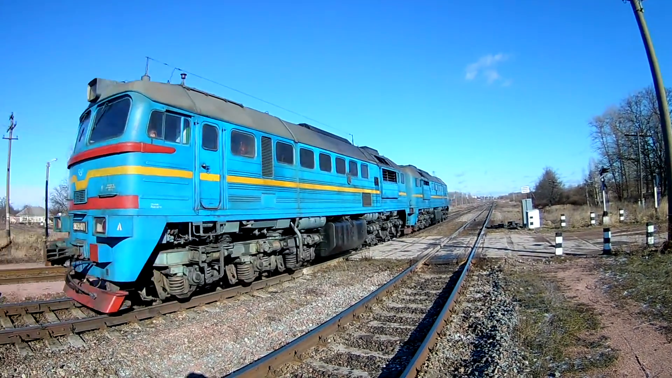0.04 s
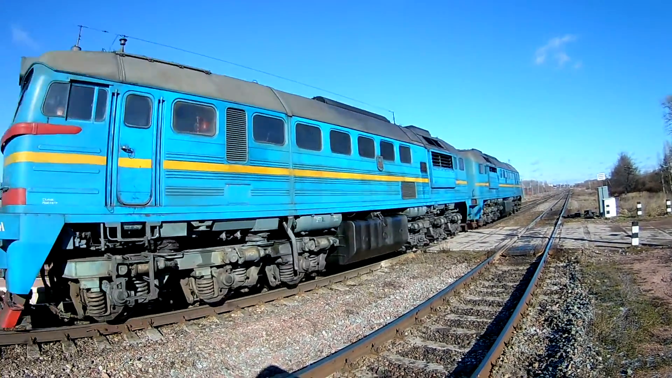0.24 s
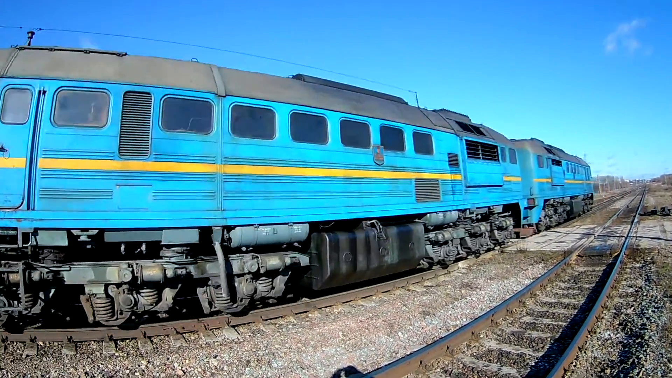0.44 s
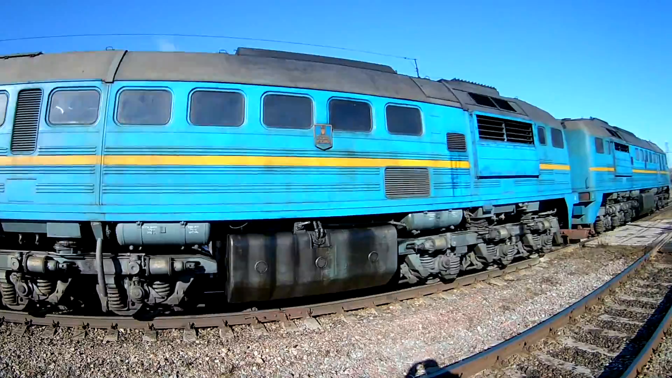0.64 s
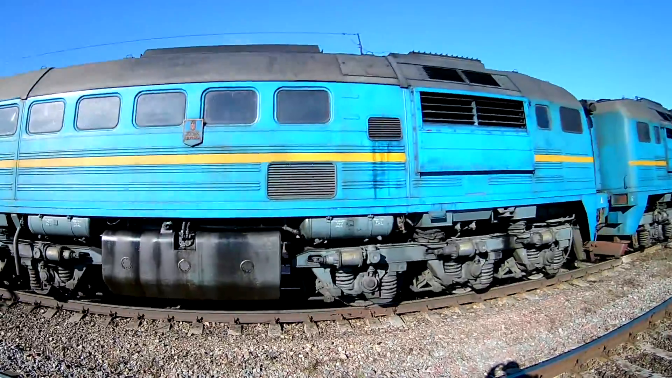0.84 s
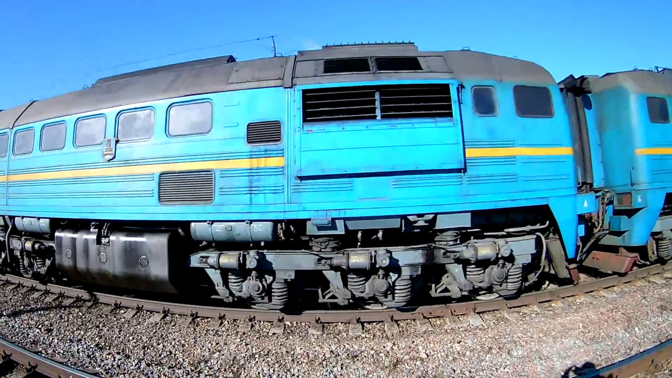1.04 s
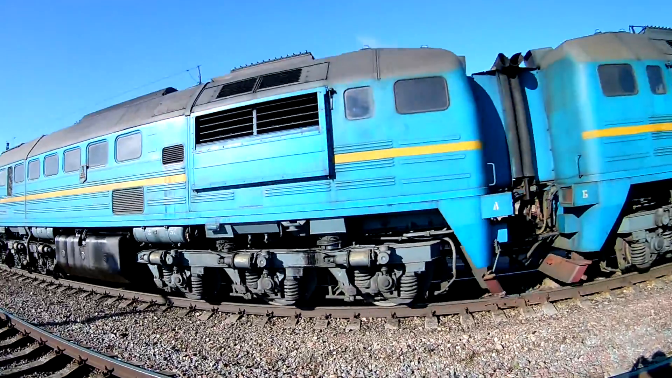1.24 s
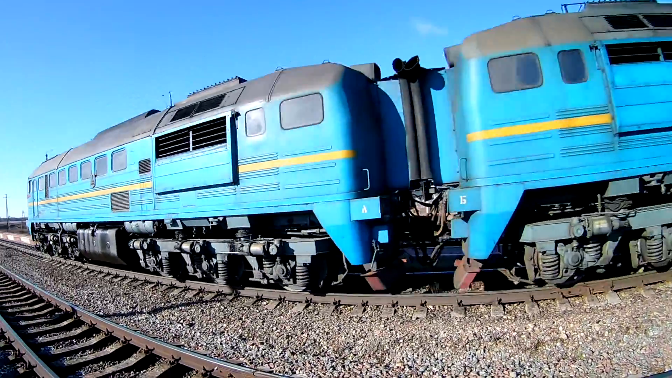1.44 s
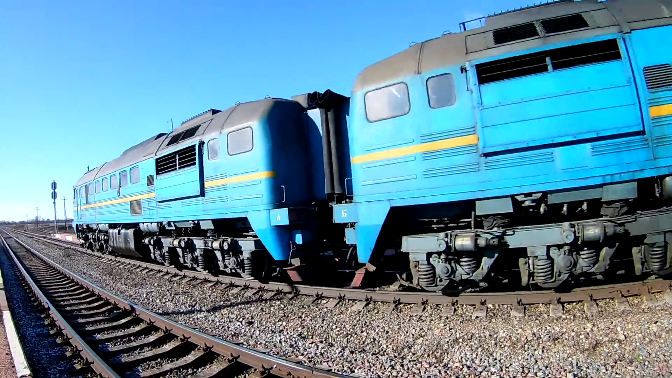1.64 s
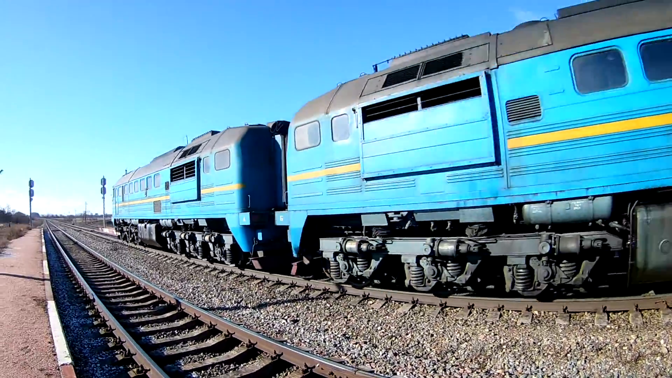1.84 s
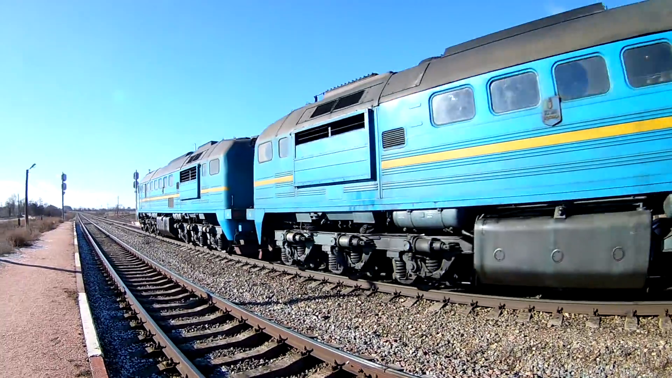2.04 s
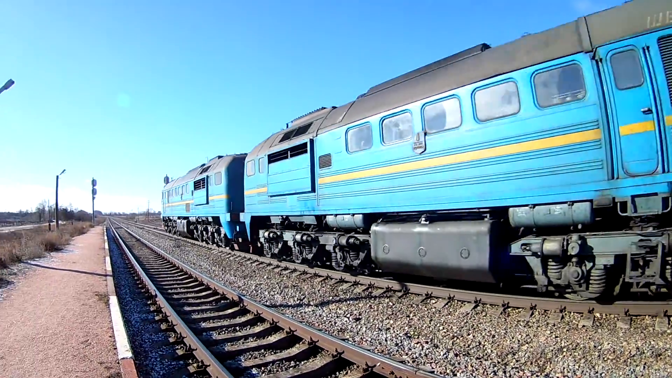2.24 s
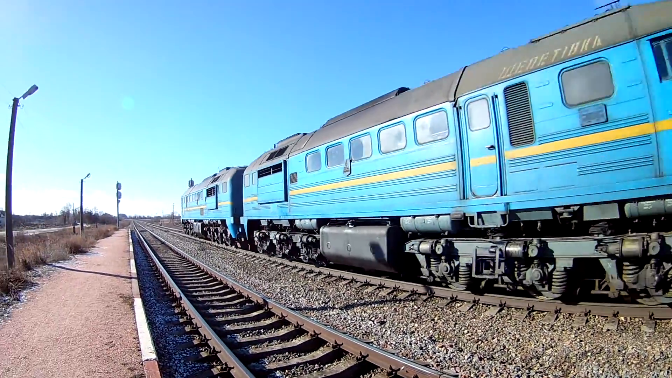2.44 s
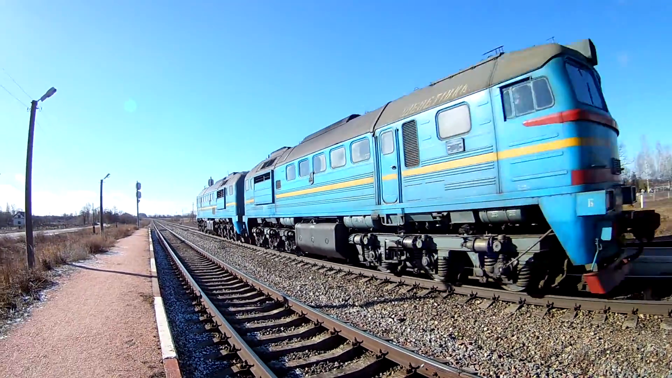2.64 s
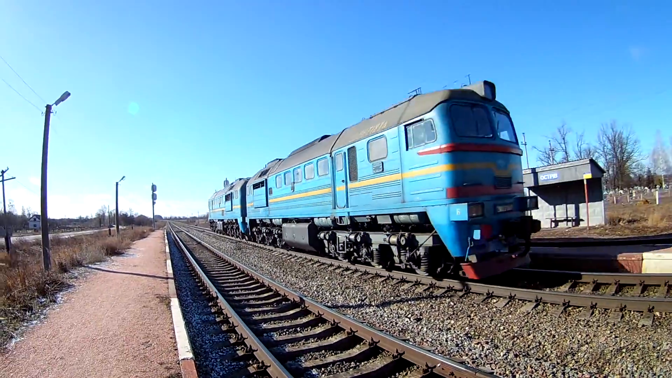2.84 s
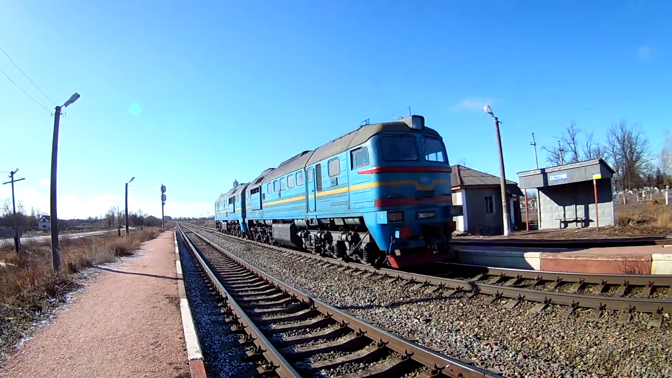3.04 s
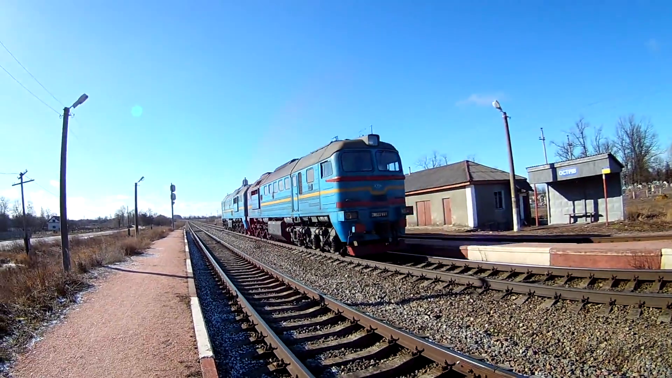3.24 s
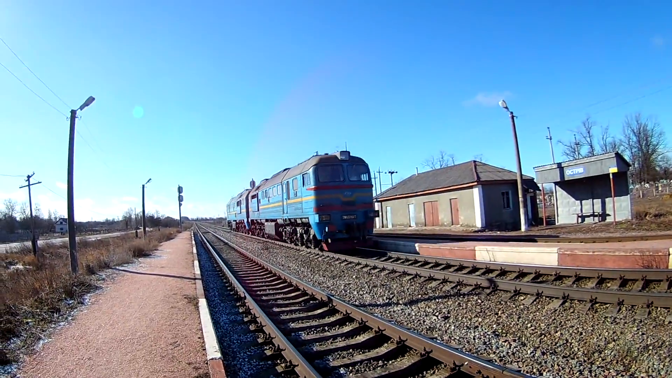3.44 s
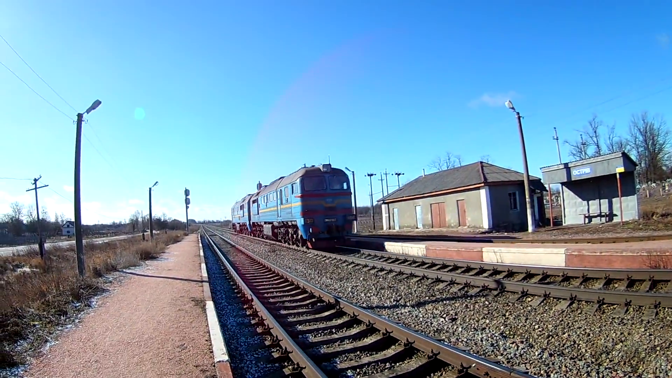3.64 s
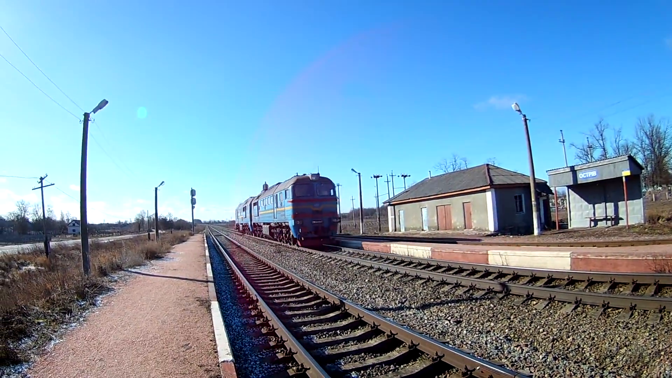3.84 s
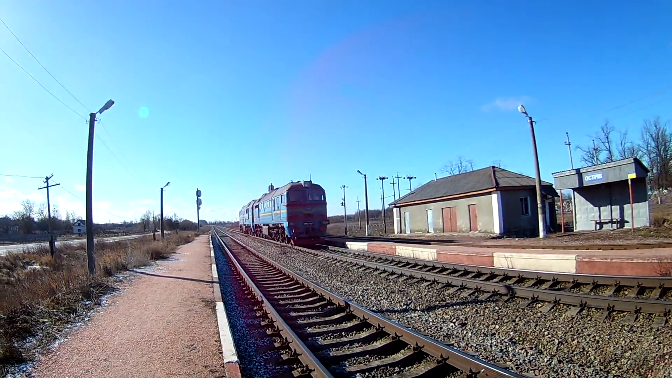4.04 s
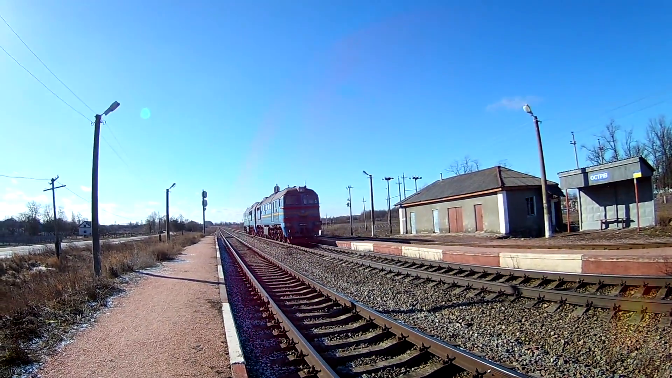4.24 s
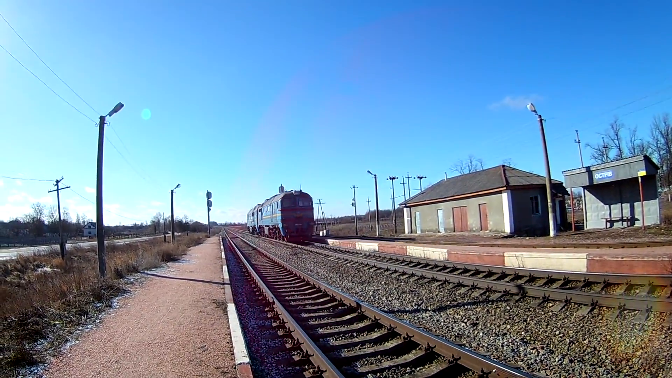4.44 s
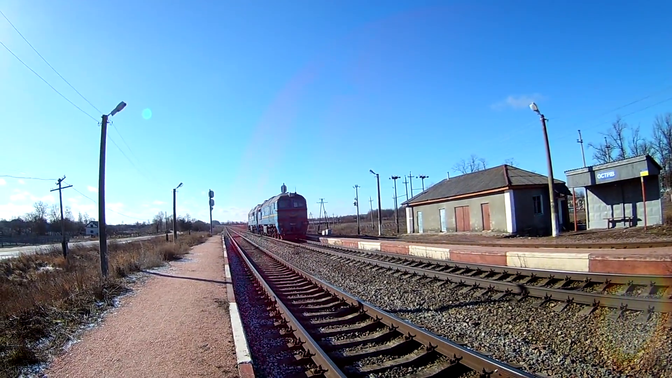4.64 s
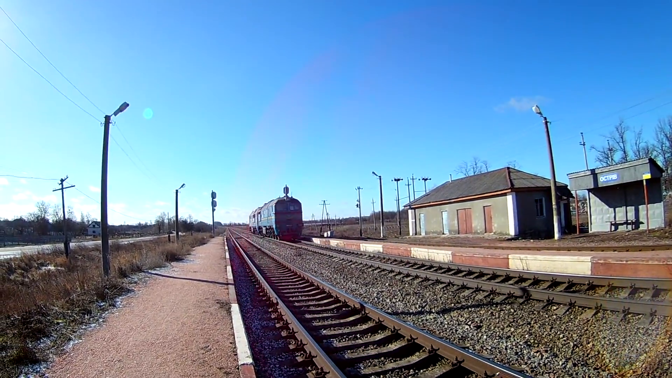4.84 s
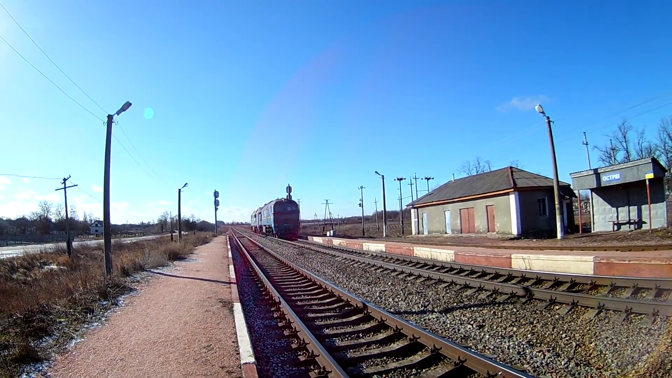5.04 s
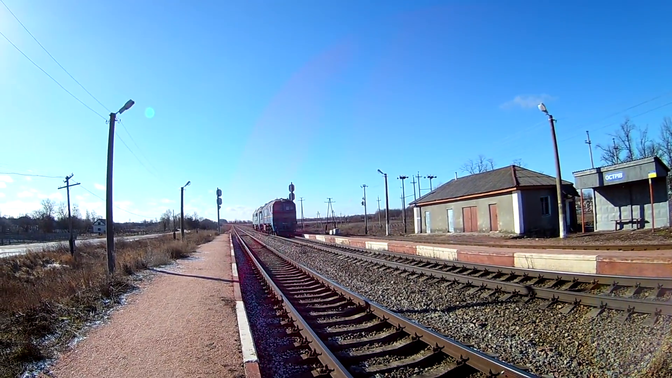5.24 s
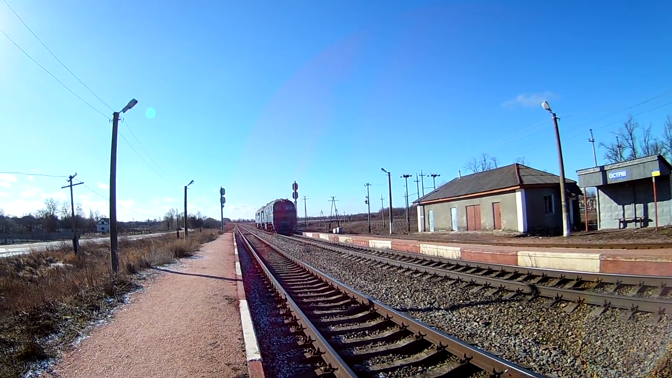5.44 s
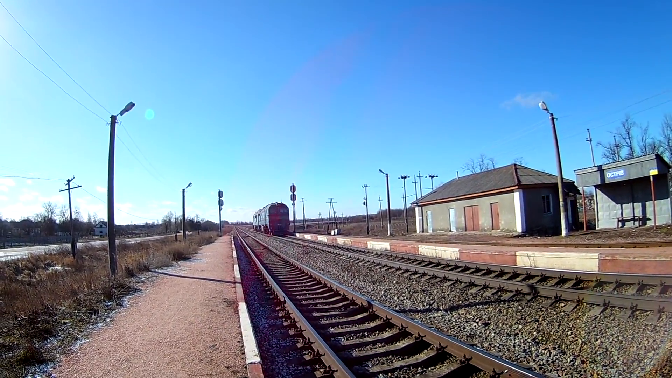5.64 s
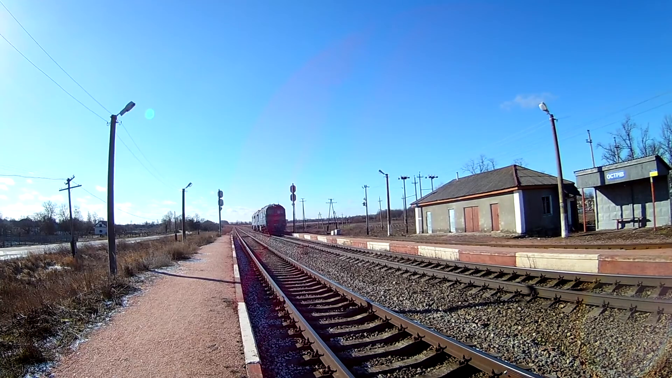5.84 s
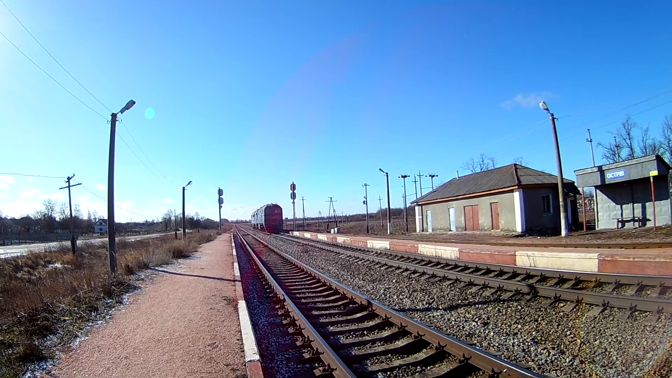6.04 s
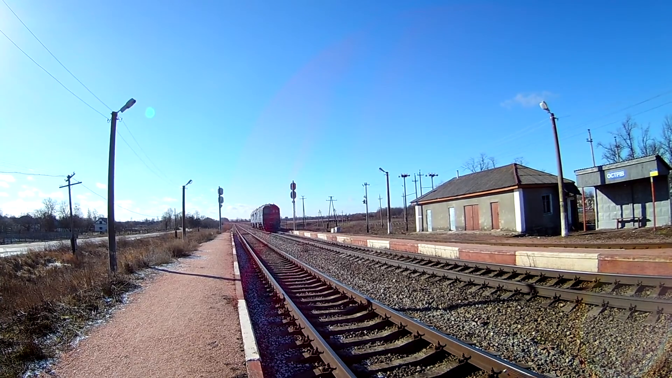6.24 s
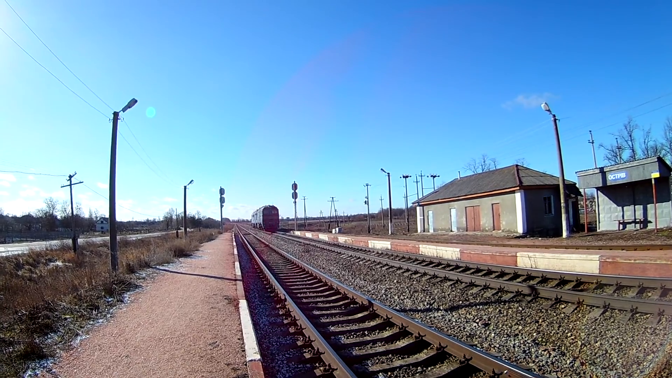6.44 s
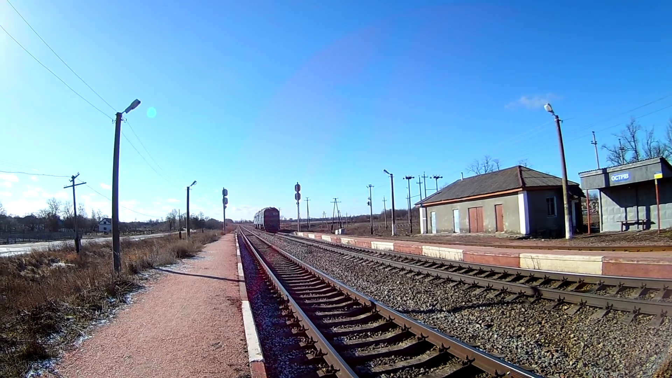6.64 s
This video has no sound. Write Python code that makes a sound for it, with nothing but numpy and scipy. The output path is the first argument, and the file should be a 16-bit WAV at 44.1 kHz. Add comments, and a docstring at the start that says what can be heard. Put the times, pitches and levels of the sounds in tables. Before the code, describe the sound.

A twin diesel locomotive is already beside the microphone outdoors at a small station. Triple wheel bangs hammer on rail joints over roar and hiss, while engines throb, gears whine and a fan hums, all sliding down in pitch. After about two and a half seconds it draws away, leaving duller distant knocks, a fading low drone and a brief puff of air.

```python
"""Two slow diesel engines throb over wheel roar, and bangs at once mark a close two-section locomotive.
It runs away along a station track: exhausts and whines drop in pitch by the Doppler effect and fade.
Exhausts and gears are harmonic and modulated tones, rolling and turbulence are shaped noise, and each
axle of the three-axle bogies strikes the rail joints as dying noise and steel modes.
The microphone's case cuts notches in the treble and its circuit limits the loudest bangs."""
import sys
import numpy as np
from scipy import signal
from scipy.fft import rfft, irfft, next_fast_len
from scipy.io import wavfile
from scipy.ndimage import uniform_filter1d, map_coordinates

SR = 44100
rng = np.random.default_rng(int(sys.argv[2]) if len(sys.argv) > 2 else 0)


def dump(signal):
    """Clip the signal to [-1, 1] and save it as 16-bit WAV at the path in sys.argv[1]."""
    limited = np.clip(np.atleast_2d(signal).T, -1, 1)
    pcm = np.round(limited * 32767).astype(np.int16)
    wavfile.write(sys.argv[1], SR, pcm)


N = 295470  # samples
SPEED, ASIDE = 16.5, 6  # m/s along the track, m from track to microphone


def amp(db):
    """Level definition: dB to amplitude gain."""
    return 10 ** (np.asarray(db) / 20)


def unit(x):
    """Normalization to an rms of 1."""
    return x / np.sqrt(np.mean(x ** 2) + 1e-20)


def along(points, hz):
    """Interpolation of (f/Hz, value) points on a logarithmic frequency axis."""
    f, v = np.transpose(points)
    return np.interp(np.log(hz + 1), np.log(f + 1), v)


def curves(rows):
    """Linear interpolation in time: one curve for each column after t/s."""
    s, *columns = np.transpose(rows)
    return [np.interp(np.arange(N) / SR, s, column) for column in columns]


def wobble(rate):
    """Band-limited random modulation: a smooth curve through `rate` random knots a second."""
    s = np.arange(0, N + 64, 64)
    knots = rng.standard_normal(int(N * rate / SR) + 4)
    return np.interp(np.arange(N), s, map_coordinates(knots, [s * rate / SR]))


def filtered(x, response):
    """Linear filtering: the spectrum of x times a response of frequency."""
    n = x.shape[-1]
    m = next_fast_len(n + 4096)
    return irfft(rfft(x, m) * response(np.fft.rfftfreq(m, 1 / SR)), m)[..., :n]


def colour(points):
    """Spectral shaping: gain through (f/Hz, level/dB) points, falling steeply beyond the ends."""
    closed = [(points[0][0] / 4, -120), *points, (points[-1][0] * 4, -160)]
    return lambda hz: amp(along(closed, hz))


def dips(rows):
    """Destructive interference: the gain of a set of narrow cancellations."""
    return lambda hz: amp(sum(db / (1 + ((hz - centre) / width) ** 2 * 4) for centre, width, db in rows))


def rush(gain, patchy_db):
    """Turbulent noise of rms 1, whose gain varies at random in patches of time and frequency."""
    z = signal.stft(rng.standard_normal(N), nperseg=512)[2]
    field = uniform_filter1d(uniform_filter1d(rng.standard_normal(z.shape), 5, 0), 8, 1)
    patchy = signal.istft(z * amp(patchy_db * unit(field)), nperseg=512)[1][:N]
    return unit(filtered(patchy, gain))


def turns(hz):
    """Phase in radians as the running integral of frequency."""
    return 2 * np.pi * np.cumsum(hz) / SR


def doppler(passing):
    """Doppler effect: pitch factor of a source that draws level with the microphone at that second."""
    ahead = SPEED * (np.arange(N) / SR - passing)
    return 1 / (1 + SPEED / 343 * ahead / np.hypot(ahead, ASIDE))


def passing_db(passing, near_m, coming_db, going_db):
    """Distance law: level re the loudest, with a fall per doubling of distance on each side."""
    ahead = SPEED * (np.arange(N) / SR - passing)
    return -np.where(ahead < 0, coming_db, going_db) * np.log2(np.hypot(ahead, near_m) / near_m)


# trailing draught: (centre t/s, half length/s, level/dB before random swelling)
GUSTS = [(5.45, .08, -32.5), (6.4, .2, -42)]
# suction pop: (start t/s, start to trough/s, depth of the trough level/dB)
SUCTION_POP = (5.458, .004, -13)
# low noise of buffeting and of the rumbling body: (f/Hz, relative level/dB)
RUMBLE_SPECTRUM = [(60, -12), (120, -4.5), (200, 2.5), (340, 5.5), (480, -6), (700, -21)]


def draught():
    """Turbulent pressure: swirling air buffets the microphone briefly, with one suction pop."""
    t = np.arange(N) / SR
    start, length, pop_db = SUCTION_POP
    swell = sum(amp(db) * np.exp(-((t - s) / half) ** 2) for s, half, db in GUSTS)
    buffeting = swell * amp(4.4 * wobble(30)) * rush(colour(RUMBLE_SPECTRUM), patchy_db=2.5)
    suction = amp(pop_db) * np.exp(-((t - start - length) / length) ** 2 * 4)
    return buffeting - suction


# fan tone: (level/dB when abreast, fall/dB per doubling of distance, nearest distance/m,
#            the same level and the going fall for what trails behind)
FAN = (-21.5, 12.5, 3, -33, 3.5)
FAN_HZ, FAN_PASS = 161, 1.9  # blade tone of the trailing section before Doppler, second of passing


def fan():
    """Blade-passing tone: the cooling fan hums and falls in pitch as it passes."""
    db, fall_db, near_m, trail_db, trail_fall_db = FAN
    blades = turns(FAN_HZ * doppler(FAN_PASS)) + .5 * wobble(6.6)
    near = amp(db + passing_db(FAN_PASS, near_m, fall_db, fall_db))
    trail = amp(trail_db + passing_db(FAN_PASS, ASIDE, fall_db, trail_fall_db))
    return np.sqrt(2) * (near + trail) * amp(1.5 * wobble(6)) * np.sin(blades)


# gear whines of passing axle drives: (start t/s, passing t/s, f/Hz before Doppler, carrier rms level/dB
#   before wavering, rise/s, fall/dB per s, final fall re top/dB, length/s)
GEAR_WHINES = [(-0.06, .5, 1062, -9.5, 0.12, 148, 10, .45), (.17, 1.05, 770, -18.5, 0.049, 42, 2.5, .3),
               (0.56, 0.96, 770, -20, 0.049, 16, 2.5, 0.51), (1.16, 0.88, 850, -20.5, .08, 40.5, 6, .2),
               (.99, 2, 983, -15.5, .07, 43.5, 10, .56)]
WHINE_RELEASE_S = .04


def whines():
    """Gear meshing and amplitude modulation: teeth sing, and the motor shaft's turning adds side tones."""
    out, t = np.zeros(N), np.arange(N) / SR
    for s, passing, pitch_hz, db, rise, fall_db, settle_db, length in GEAR_WHINES:
        hz = pitch_hz * doppler(passing)
        gate = np.clip(np.minimum((t - s) / rise, (s + length - t) / WHINE_RELEASE_S), 0, 1)
        shape = gate * amp(-np.clip(fall_db * (t - s - rise), 0, settle_db))
        beat = 1 + 0.48 * np.cos(turns(hz / 41))  # one shaft turn for 41 teeth
        tone = np.sin(turns(hz) + .75 * wobble(30))
        out += np.sqrt(2) * amp(db + 2.2 * wobble(22)) * shape * beat * tone
    return out


# exhaust tones: (multiple of the shaft rate, leading relative level/dB, trailing relative level/dB)
EXHAUST_ORDERS = [(6, 0, 0), (7, -12, -13), (8, 0, -9), (9, -2, -2), (10, -6, -13), (11, -9, -18),
                  (12, -14, -13), (14, -5, -10), (15, -1, -9), (16, -9, -9), (17, -14, -14)]
# leading and trailing engine: (passing t/s, shaft rate f/Hz before Doppler, slowing/Hz per s after 4 s)
ENGINE_PASSES = [(1.0, 6.65, 0), (2.05, 6.22, .055)]
# leading and trailing exhaust: (loudest t/s, level/dB, fall/dB per doubling of distance coming, going)
EXHAUST_LEVELS = [(.7, -21.5, 4.5, 5.35), (1.95, -21.5, 5, 15)]
# trailing exhaust carried back along the platforms: (level/dB, fall/dB per doubling of distance going)
PLATFORM_DRONE = (-24, 2.59)
# exhaust turbulence: (f/Hz, relative level/dB per Hz)
BOOM_SPECTRUM = [(12, -18), (25, -26.5), (45, 0), (95, 0.5), (150, -9), (230, -11.5)]


def engines():
    """Harmonic synthesis: exhausts sound swelling multiples of the shaft rate over turbulent boom."""
    out, t = np.zeros(N), np.arange(N) / SR
    levels_db = [db + passing_db(s, ASIDE, coming, going) for s, db, coming, going in EXHAUST_LEVELS]
    drone_db, drone_fall_db = PLATFORM_DRONE
    drone = amp(drone_db + passing_db(EXHAUST_LEVELS[1][0], ASIDE, 12, drone_fall_db))
    levels_db[1] = 20 * np.log10(np.hypot(amp(levels_db[1]), drone))
    for which, ((passing, shaft_hz, slowing), level_db) in enumerate(zip(ENGINE_PASSES, levels_db)):
        shaft = turns((shaft_hz - slowing * np.maximum(t - 4, 0)) * doppler(passing))
        for order, *db in EXHAUST_ORDERS:
            tone = np.sin(round(order) * shaft + rng.uniform(0, 2 * np.pi) + 0.35 * wobble(4))
            out += amp(level_db + db[which] + 2.2 * wobble(4)) * tone
    boom = amp(-1.0) * np.hypot(*amp(levels_db)) * rush(colour(BOOM_SPECTRUM), patchy_db=0.4)
    return out + boom


# rolling noise before shaking: (t/s, wheel and rail roar level/dB, body rumble level/dB)
ROLLING_LEVELS = [(0, -19.5, -21.5), (.2, -19.5, -20), (.5, -18, -17.5), (.82, -18.5, -18),
                  (1.16, -16.5, -14), (1.55, -17, -17), (2.24, -18, -18.5), (2.45, -19, -19),
                  (2.7, -21, -22), (2.92, -24.5, -27.5), (3.73, -28.5, -34), (4.05, -27, -28),
                  (4.29, -32, -32.5), (5.09, -35, -41), (5.88, -34, -37.5), (6.44, -41.5, -45),
                  (6.7, -39.5, -45)]
# rail ring before shaking: (t/s, level/dB)
RING_LEVELS = [(0, -28.5), (.5, -27.5), (1.85, -21.5), (2.3, -29), (3.7, -32), (4.6, -34.5), (4.76, -28.5),
               (4.9, -42), (6.7, -49)]
# wheel and rail roar: (f/Hz, relative level/dB)
ROAR_SPECTRUM = [(250, -32.5), (480, -3), (750, -2.5), (1050, -2.5), (1300, -8), (1650, -9), (2100, -17.5),
                 (2700, -32)]
# rolling hiss: (f/Hz, relative level/dB)
HISS_SPECTRUM = [(1400, -19), (2200, 7), (3100, 2.5), (3850, -5), (4060, -0.5), (4250, -7.5), (4700, -13),
                 (5600, -12.5), (7300, -26), (10000, -36), (12500, -45.5)]
# hiss level: (level/dB at a roar of 0 dB, dB per dB of roar, dB lacking at first, made up by t/s)
HISS_FOLLOWS = (-15, 1.18, 3.5, 0.5)
# the rail's bending between sleepers: (f/Hz, half width/Hz)
RAIL_RESONANCE = (662, 34)


def rolling():
    """Roughness excitation: wheels on rails rumble, roar, hiss and ring, shaken partly together."""
    roar_db, rumble_db = curves(ROLLING_LEVELS)
    ring_db, = curves(RING_LEVELS)
    db, slope, lack_db, until = HISS_FOLLOWS
    hiss_db = db + slope * roar_db - lack_db * np.clip(1 - np.arange(N) / SR / until, 0, 1)
    shake = wobble(14)
    ring_hz, ring_width = RAIL_RESONANCE
    resonance = lambda hz: 1 / (1 + ((hz - ring_hz) / ring_width) ** 2)
    rumble_gain = amp(rumble_db + 0.74 * wobble(25) + 0.32 * shake)
    rumble = rumble_gain * rush(colour(RUMBLE_SPECTRUM), patchy_db=1.0)
    roar = amp(roar_db + .6 * shake) * rush(colour(ROAR_SPECTRUM), patchy_db=.8)
    hiss = amp(hiss_db + 1.1 * shake + .7 * wobble(40)) * rush(colour(HISS_SPECTRUM), patchy_db=1.2)
    ring = amp(ring_db + 2.4 * wobble(7.04)) * rush(resonance, patchy_db=3.0)
    return rumble + roar + hiss + ring


# short dull knocks: (t/s, level/dB of each mode before rise and decay, f/Hz of the middle mode, t60/s)
KNOCKS = [(3.973, -2, 647, 0.028), (4.099, -11.5, 900, 0.064)]
CLUNK_RISE_S, CLUNK_SPREAD = .004, (.72, 1, 1.33)  # rise; three close modes re the middle one


def clunks():
    """Modal synthesis: two rounded knocks, each of three close, quickly dying modes."""
    out, t = np.zeros(N), np.arange(SR // 8) / SR
    for s, db, hz, t60 in KNOCKS:
        shape = (1 - np.exp(-(t / CLUNK_RISE_S) ** 2)) * amp(db - 60 * t / t60)
        modes = sum(np.cos(2 * np.pi * hz * k * (t - CLUNK_RISE_S) + rng.normal(0, .5))
                    for k in CLUNK_SPREAD)
        out[round(s * SR):][:len(t)] += shape * modes
    return out


# rail joints: (first axle t/s, share by which intervals lengthen, mean sizzle re crack level/dB,
#   crack gain/dB per axle, for each bogie heard (first crack level/dB, clang and first thud re crack
#   level/dB), all before the trims in joints())
RAIL_JOINTS = [(.0705, 0.001, -40, -0.68, [(-27, 10, 11), (-27.5, 8, 14), (-31.5, 6, 10), (-26.5, 10, 10)]),
               (0.281, 0.00041, -28, -0.18, [(-12.5, 8.6, 13.6), (-9.5, 6.6, 8.2), (-9.5, 6.6, 10.1),
               (-11, 7.9, 10.8)]), (2.0066, .0085, -25, 1, [(-30.5, 2.6, 4), (-31, 8.6, 9.6),
               (-33, 6.7, 12.6), (-26.5, 12.5, 9.2)]), (2.053, .0085, -32, -0.12, [(-38, 5, 3.6),
               (-34.5, 17, 3.4), (-26.5, 12, 7), (-28, 14, 2)]),
               (3.8635, .0085, -38, 1, [None, (-45, 21, 8), (-40, 14, 13), (-36.5, 14.8, 3)]),
               (3.883, .0085, -36, 1.2, [None, (-48, 21, 12), (-37, 12, 2.2), (-42.5, 10, 8)]),
               (4.769, .0085, -38, -0.12, [(-40.5, 20, 15.7), (-45, 14, 15), (-44, 13, 12), (-44, 16, 14)])]
BOGIES_S, AXLE_S = (0, .6152, 1.1972, 1.8135), .1268  # bogies after the first; axle after axle
THUD_GROWS_DB, SIZZLE_FADES_DB = 1.37, 2.5  # per axle of a bogie; per bogie


def blows():
    """Wheel kinematics: each axle on each joint as (t/s, crack, clang, thud, sizzle level/dB, metres)."""
    nearest = RAIL_JOINTS[1][0]
    rows = []
    for first, slower, sizzle_db, grows_db, bogies in RAIL_JOINTS:
        metres = SPEED * (first - nearest)
        for which, (after, bogie) in enumerate(zip(BOGIES_S, bogies)):
            if not bogie:
                continue
            crack_db, clang_db, thud_db = bogie
            bogie_sizzle_db = sizzle_db - SIZZLE_FADES_DB * (which - 1.5)
            for k in range(3):
                s = first + (after + k * AXLE_S) * (1 + slower)
                rows.append((s, crack_db + k * grows_db, clang_db, thud_db + k * THUD_GROWS_DB,
                             bogie_sizzle_db, metres))
    return [row for row in rows if row[0] < N / SR]


def dying(t60s, size, stretch):
    """Frequency-dependent damping: noise in which each frequency dies at its own speed."""
    hz, t, z = signal.stft(rng.standard_normal(size), SR, nperseg=128)
    decay = amp(-60 * t / stretch / along(t60s, hz)[:, None])
    return signal.istft(z * decay, SR, nperseg=128)[1][:size]


# spectra of the four parts of a blow: (f/Hz, relative level/dB per Hz)
CRACK_SPECTRUM = [(1700, 3.5), (2500, 0), (3900, -3.5), (5000, -11.5), (7000, -18.5), (8500, -30)]
CLANG_SPECTRUM = [(650, -3.5), (950, 9), (1500, 3.5), (1900, -1.5), (2500, -22.5)]
THUD_SPECTRUM = [(110, -12), (220, 4.5), (400, 9), (750, 4), (1050, -12)]
SIZZLE_SPECTRUM = [(7000, -1), (8500, -1), (11000, 7), (12500, -8.5), (15500, -15)]
# bang decay of a near blow: (f/Hz, t60/s)
BANG_DECAY = [(200, 0.47), (700, 0.16), (1600, 0.13), (4000, 0.095), (10000, 0.087)]
# frame rattle and echo after a bang: (f/Hz, t60/s)
ECHO_DECAY = [(200, 0.54), (2000, 0.25), (10000, 0.2)]
# wheel and rail modes: (mean f/Hz, mean relative level/dB, t60/s)
STEEL_MODES = [(364, -5, 0.16), (538.5, -5, 0.14), (714.4, -1, 0.12), (925.6, -3.5, 0.13),
               (1100, 4.5, 0.078), (1313, -2.5, 0.11), (1523, 0, 0.1), (1778, -4.5, 0.15),
               (2880, -10.5, 0.21), (3590, 3, 0.05), (4050, -0.5, 0.11), (5600, -1.5, 0.068)]
# rise of a blow's low parts: (near/s, added at full distance/s)
LOW_RISE = (.0013, 0.03)
FAR_M = 220  # distance at which a blow is fully dulled
CRACK_RISE_S = .0008  # near
BLOW_COLOUR_DB = 3  # every blow lifts other parts of the treble


def joints():
    """Impact excitation: snap, steel modes and dying noise; far blows rise slower and echo more."""
    size = SR // 4
    out, t, hz = np.zeros(N + size), np.arange(size) / SR, np.fft.rfftfreq(size, 1 / SR)
    spectra = (CRACK_SPECTRUM, CLANG_SPECTRUM, THUD_SPECTRUM, SIZZLE_SPECTRUM)
    crack, clang, thud, sizzle = (unit(colour(points)(hz)) for points in spectra)
    mode_hz, mode_db, t60 = np.transpose(STEEL_MODES)[..., None]
    for s, db, clang_db, thud_db, sizzle_db, metres in blows():
        far = np.clip(metres / FAR_M, 0, 1)
        air = amp(-1.2 * far ** 2 * hz / 1000)  # the air swallows treble with distance
        tint_db = BLOW_COLOUR_DB * np.interp(hz, np.arange(0, 16000, 600), rng.standard_normal(27))
        level_draw, pitch_draw, phase = rng.standard_normal((3, len(STEEL_MODES), 1))
        mode_gain = amp(mode_db + 1.07 * level_draw - 60 * t / t60)
        ring = mode_gain * np.sin(2 * np.pi * (mode_hz * (1 + 0.0285 * pitch_draw) * t + phase))
        snap = 0.68 * amp(-60 * t / 0.023) * rng.standard_normal(size)
        bang = dying(BANG_DECAY, size, 1 + 2.0 * far ** 2)
        echo = amp(-11 + 4.6 * far) * dying(ECHO_DECAY, size, 1)
        blow = rfft(bang + echo + amp(-17.5) * ring.sum(0) + (1 - far) * snap)
        high = irfft(blow * (crack + amp(sizzle_db) * sizzle) * amp(tint_db) * air, size)
        high *= 1 - np.exp(-t / (CRACK_RISE_S + 0.014 * far ** 2))
        low = irfft(blow * (amp(clang_db + 0.5) * clang + amp(thud_db - 1.0) * thud), size)
        low *= 1 - np.exp(-(t / (LOW_RISE[0] + LOW_RISE[1] * far)) ** 2)
        fade = np.hanning(2 * size)[size:]
        out[round(s * SR):][:size] += amp(db - 6.5) * (high + low) * fade
    return out[:N]


# ground echo cancels these from afar: (f/Hz, width/Hz, level/dB)
GROUND_DIPS = [(440, 110, -2.5), (1080, 210, -5.5), (2030, 220, -3)]


def scene():
    """Superposition and ground interference: the low-lying wheels graze the ground more when far."""
    wheels = rolling() + clunks() + joints()
    far = np.clip((np.arange(N) / SR - 2.5) / 2, 0, 1)
    wheels = (1 - far) * wheels + far * filtered(wheels, dips(GROUND_DIPS))
    return (draught() + fan() + whines() + engines() + wheels)[None]


# case cancellations: (f/Hz, width/Hz, level/dB)
CASE_NOTCHES = [(7950, 330, -26), (13400, 700, -12)]
# shallow dips: (f/Hz, width/Hz, level/dB)
SHALLOW_DIPS = [(486, 147, -1.5), (1175, 110, -1.5), (2470, 1900, -2), (3340, 640, -1.5)]
TOP_HZ = 15750


def record(dry):
    """Transducer response: notches, rounded clipping, circuit hiss and the band limit."""
    x = filtered(dry, lambda hz: dips([*CASE_NOTCHES, *SHALLOW_DIPS])(hz) * (hz > 18))
    x = x / (1 + np.abs(x) ** 8) ** (1 / 8)
    x = x + amp(-79) * rng.standard_normal(x.shape)
    return filtered(x, lambda hz: hz < TOP_HZ)


dry = scene()
out = record(dry)
dump(out)
```